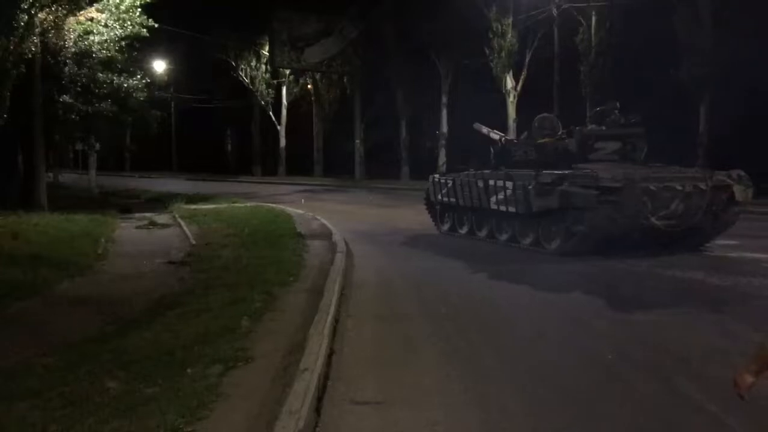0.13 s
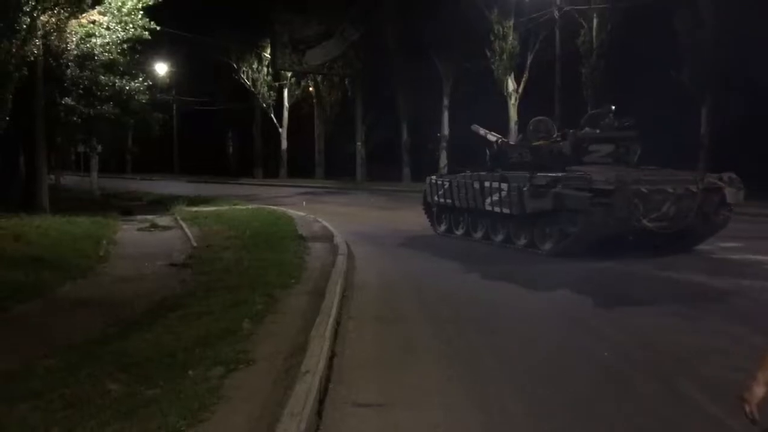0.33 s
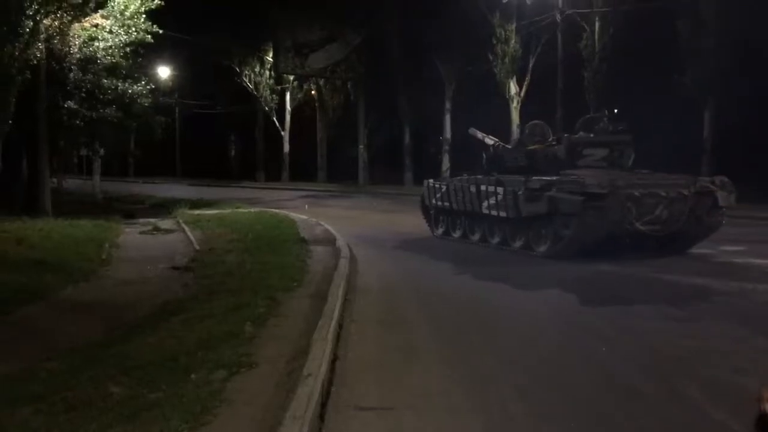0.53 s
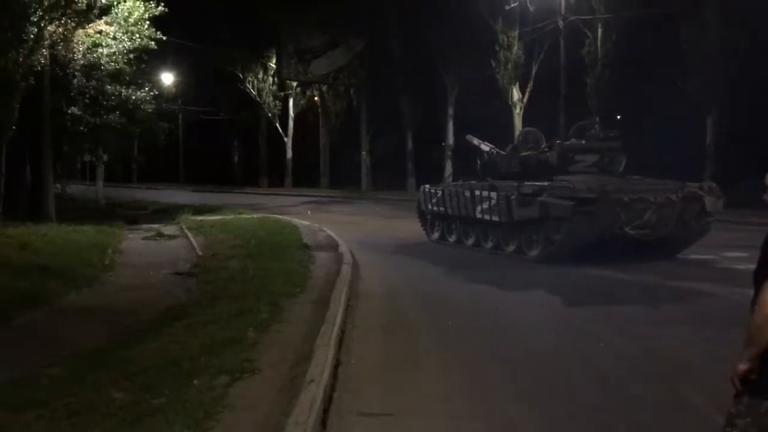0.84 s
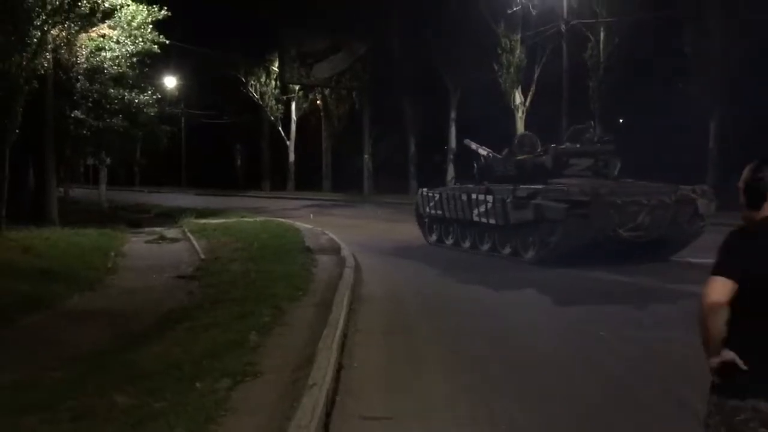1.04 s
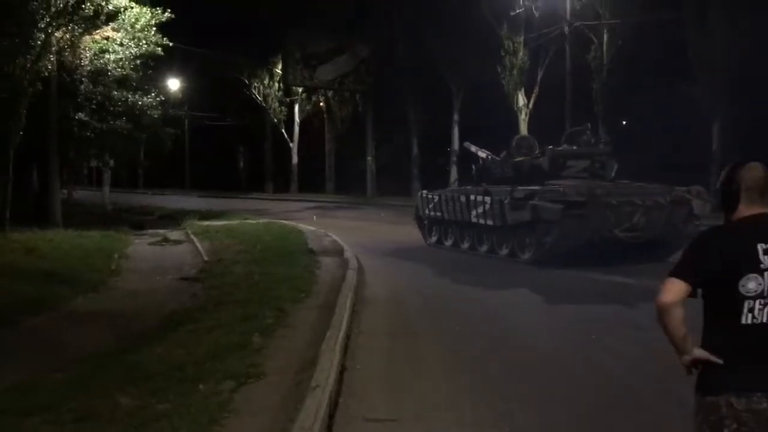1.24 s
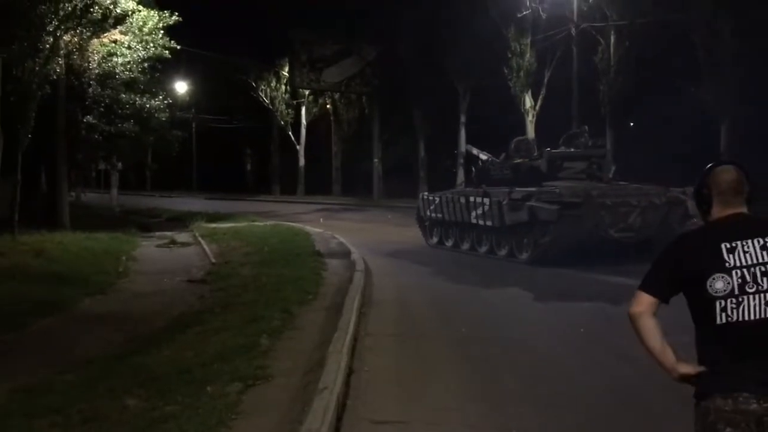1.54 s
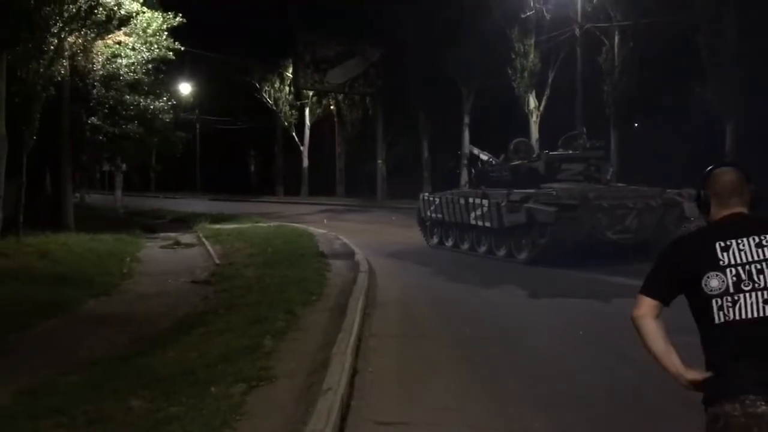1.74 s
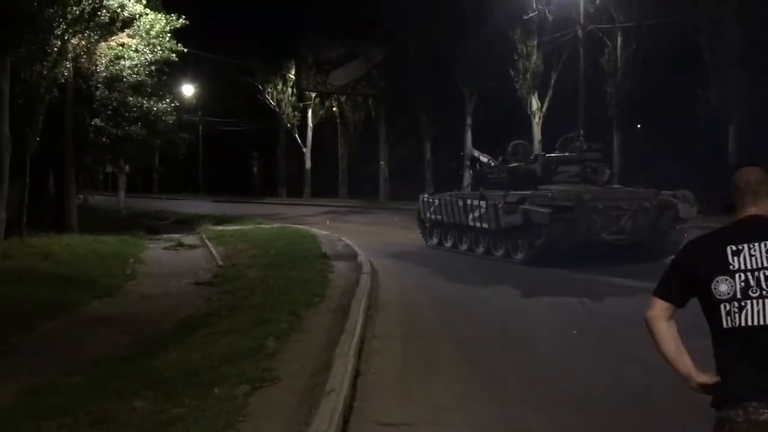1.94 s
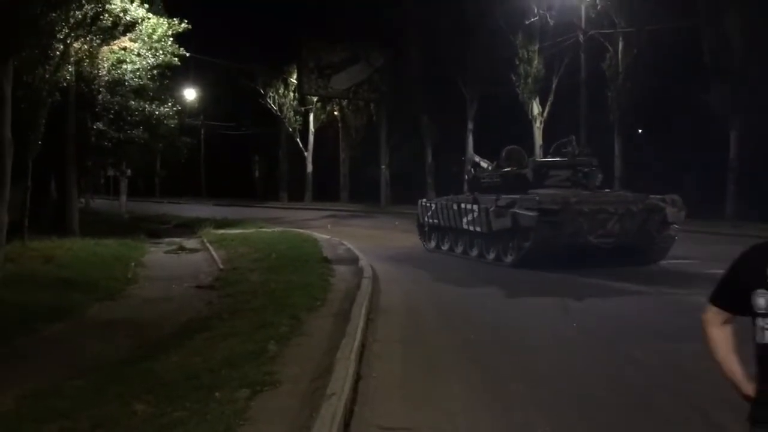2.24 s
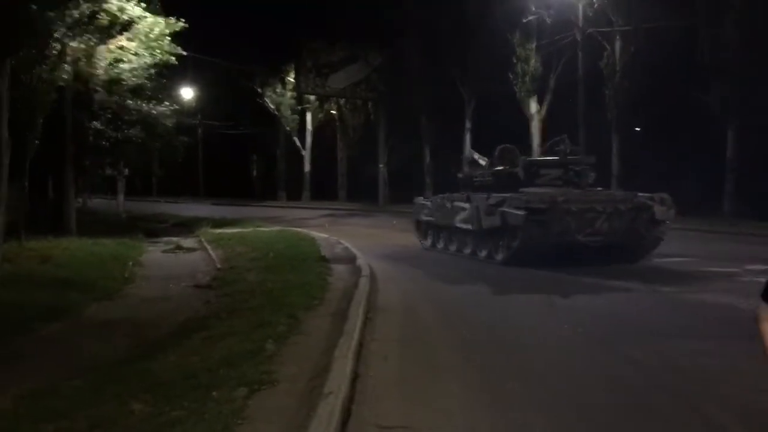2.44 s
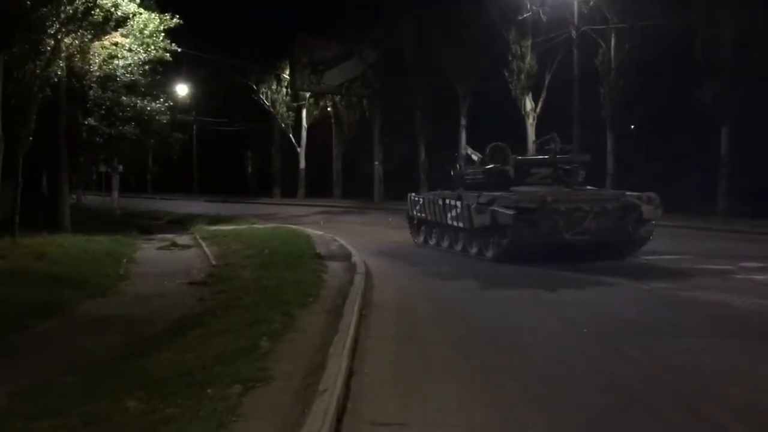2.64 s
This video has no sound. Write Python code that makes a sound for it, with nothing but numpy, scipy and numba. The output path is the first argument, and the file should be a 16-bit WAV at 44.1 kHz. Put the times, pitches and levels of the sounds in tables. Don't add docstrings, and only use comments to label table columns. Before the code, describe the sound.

Deep, uneven diesel drone and broad exhaust roar from a heavy tracked vehicle on an open road, starting abruptly; faint whine, track clatter and plate rattles beneath, squeaks growing denser toward the end, caught by a phone.

```python
import sys
import numpy as np
from scipy import signal
from scipy.fft import rfft, irfft
from scipy.io import wavfile
from scipy.ndimage import uniform_filter1d
from numba import njit

SR = 44100
rng = np.random.default_rng(int(sys.argv[2]) if len(sys.argv) > 2 else 0)


def how_loud(loudness_db):
    steps = np.asarray(loudness_db, float) / 20
    return 10 ** steps


def unload_wav(signal):
    wavfile.write(
        sys.argv[1],
        SR,
        np.round(np.clip(np.atleast_2d(signal).T, -1, 1) * 32767).astype(np.int16),
    )


N = 123039
CYLINDERS = 12


def level(x, db):
    return x * how_loud(db) / np.sqrt(np.mean(x ** 2))


@njit
def svf(x, hz, width):
    y, b, l = np.empty(len(x)), 0., 0.
    for i in range(len(x)):
        g, k = np.tan(np.pi * hz[i] / SR), width / hz[i]
        v = (b + g * (x[i] - l)) / (1 + g * (g + k))
        b, l, y[i] = 2 * v - b, l + 2 * g * v, k * v
    return y


def band(x, hz, width):
    return svf(x, hz + np.zeros(N), float(width))


def noise():
    return rng.standard_normal(N)


def walk(rate):
    k = int(SR / rate)
    steps = np.repeat(rng.standard_normal(N // 50)[:N // k + 1], k)
    return 1.3 * uniform_filter1d(uniform_filter1d(steps, k), k)[:N]


def coloured(shape, shared_db, flicker_db):
    f = np.maximum(np.arange(N // 2 + 1) * SR / N, 1)
    hz, db = np.array(shape).T
    spec = rfft(noise()) * how_loud(np.interp(np.log(f), np.log(hz), db, left=-90, right=-90))
    out = 0
    for c in np.arange(np.floor(2 * np.log2(hz[0])), 2 * np.log2(hz[-1]) + 1):
        part = np.clip(1 - abs(2 * np.log2(f) - c), 0, 1)
        out = out + irfft(spec * part, N) * how_loud(flicker_db * walk(14))
    return level(out, 0) * how_loud(shared_db)


def struck(t, table, gain_db, decay_s, width_hz):
    scrape = noise()
    out = 0
    for s, db, hz in table:
        ring = level(band(band(scrape, hz, width_hz), hz, width_hz), db + gain_db)
        attack = np.clip((t - s) / 0.0084, 0, 1)
        out = out + ring * attack * np.exp(-np.maximum(t - s, 0) / decay_s)
    return out


def groan(t):
    start_s, length_s, hz, width_hz = 2.58, .07, 550, 70
    return level(band(noise(), hz, width_hz), -44.5) * np.exp(-((t - start_s) / length_s) ** 2)


def rattles(t):
    # centre in seconds, length in seconds, level in dB.
    plate_bursts = [(0.188, 0.032, -42), (0.283, 0.021, -50), (0.476, 0.029, -43), (0.581, 0.013, -40),
                    (1.1, 0.016, -45), (1.826, 0.026, -41.5), (1.926, 0.011, -38), (2.38, 0.023, -52)]
    knocks_per_s, hz, width_hz = 600, 1080, 890
    knocks = (rng.random(N) < knocks_per_s / SR) * noise()
    env = sum(how_loud(db) * np.exp(-((t - s) / length) ** 2) for s, length, db in plate_bursts)
    return env * level(band(band(knocks, hz, width_hz), hz, width_hz), 0)


def clanks(t):
    # start in seconds, level in dB, pitch in Hz.
    plate_blows = [(.276, -31, 680), (.7, -39, 1044), (.86, -32, 684), (.905, -43, 636), (1.099, -32, 1028),
                   (1.42, -45, 430), (1.65, -38, 420), (1.74, -32.5, 410), (1.811, -30.5, 397),
                   (1.99, -38.5, 332), (2.14, -39, 516), (2.258, -35.5, 635), (2.53, -30, 600),
                   (2.586, -30, 490)]
    return struck(t, plate_blows, gain_db=-5, decay_s=0.024, width_hz=97)


def squeaks(t):
    # start in seconds, peak level in dB, pitch in Hz.
    pin_scrapes = [(0.1371, -52, 3330), (0.1735, -51, 3490), (0.2279, -48, 3530), (0.5676, -49, 3330),
                   (0.7726, -52, 3390), (0.8784, -49, 3780), (1.1648, -49, 3350), (1.3738, -54, 3500),
                   (1.7799, -46, 3440), (1.8342, -48, 3360), (1.9145, -49, 3500), (2.0368, -46, 4050),
                   (2.1031, -39, 3390), (2.2099, -46, 3540), (2.2643, -48, 3350), (2.3017, -47, 3880),
                   (2.3715, -52, 3430), (2.4334, -44, 3970), (2.4803, -48, 3300), (2.5606, -46, 3550)]
    return struck(t, pin_scrapes, gain_db=-10, decay_s=0.021, width_hz=200)


def ticks(t):
    # start in seconds, level in dB.
    link_slaps = [(.157, -52), (.382, -57), (.482, -56), (1.079, -55), (1.898, -54), (1.943, -48),
                  (2.042, -53), (2.107, -53), (2.264, -55), (2.321, -53), (2.366, -53), (2.474, -54),
                  (2.649, -56), (2.758, -54)]
    gain_db, decay_s, hz = -8.5, 0.016, 6460
    env = 0
    for s, db in link_slaps:
        attack = np.clip((t - s) / 0.003, 0, 1)
        env = env + how_loud(db + gain_db) * attack * np.exp(-np.maximum(t - s, 0) / decay_s)
    return env * level(band(noise(), hz, 5000), 0)


def tracks(t, effort_db):
    # frequency in Hz, density in dB per Hz.
    grind = [(1800, -8.5), (2800, 5), (4000, 3.5), (4800, -5.5), (6100, -5), (7000, -12.5), (10000, -15.5),
             (11700, -55)]
    # frequency in Hz, 60 dB decay time in seconds, level in dB.
    link_modes = [(2340, .05, -3), (2440, .05, -6), (3420, .035, 0), (3900, .035, -3), (4600, .015, -16),
                  (6130, .03, -16)]
    # centre in seconds, length in seconds, boost in dB.
    squeals = [(.18, .03, 5), (.56, .04, 7), (1.3, .02, 4), (1.7, .02, 2), (1.79, .02, 10), (1.84, .02, 8),
               (1.96, .04, 6), (2.115, .03, 12), (2.16, .02, 7), (2.22, .02, 7), (2.265, .02, 8),
               (2.37, .025, 11), (2.49, .03, 8), (2.59, .025, 8), (2.68, .03, 7)]
    knocks_per_s, scatter_db, cap_db, patch_db = 900, 2.5, 6, 1.5
    size_db = np.minimum(scatter_db * rng.exponential(size=N), cap_db)
    size = how_loud(size_db + patch_db * walk(25.5))
    knocks = (rng.random(N) < knocks_per_s / SR) * size * rng.choice([-1., 1.], N)
    rings = 0
    for hz, t60, db in link_modes:
        width_hz = np.log(1000) / np.pi / t60
        rings = rings + level(band(band(knocks, hz, hz / 4), hz, width_hz), db)
    squeal_db = sum(db * np.exp(-((t - s) / length) ** 2) for s, length, db in squeals)
    hiss = coloured(grind, -62 + effort_db + .3 * walk(11), flicker_db=.7)
    return hiss + level(rings, -67) * how_loud(.3 * effort_db + squeal_db)


def blower(firing_hz):
    ratio, width_hz, flicker_db = 35.6, 220, 3.5
    hz = ratio * firing_hz
    whine = band(band(noise(), hz, width_hz), hz, width_hz)
    return level(whine, -71) * how_loud(flicker_db * walk(25))


def roar(cycle, load_db):
    # frequency in Hz, density in dB per Hz.
    flow = [(16, -27), (120, -3.5), (170, -1.5), (310, -8.5), (600, -9.5), (1200, -11.5), (1900, -17.5),
            (2700, -30.5)]
    # frequency in Hz, width in Hz, level in dB.
    hull_modes = [(263, 55, -58), (600, 50, -49.5), (687, 10, -60.5), (1107, 93, -58)]
    slow_puff = 0.011 * np.sin(2 * np.pi * cycle)
    third_puff = 0.11 * np.sin(2 * np.pi * cycle * CYLINDERS / 4)
    hull = 0
    for hz, width_hz, db in hull_modes:
        ring = level(band(noise(), hz * (1 + .01 * walk(2)), width_hz), db)
        hull = hull + ring * how_loud(1.5 * walk(6))
    gas = coloured(flow, -37 + load_db + 0.79 * walk(8.6), flicker_db=0.5)
    return (1 + slow_puff + third_puff) * (gas + hull * how_loud(load_db))


def exhaust(t, cycle):
    # multiple of the four-stroke cycle, level in dB rms.
    orders = [(3, -72), (4, -64), (5, -50), (6, -42), (7, -48), (9, -41), (10, -54), (11, -54), (12, -32),
              (13, -52), (14, -56), (15, -38), (16, -55), (17, -41), (18, -49), (19, -48), (20, -54),
              (21, -51), (22, -58), (23, -58), (24, -56), (26, -57), (27, -54)]
    # time in seconds, firing tone in dB, bank throb in dB, sharp edge in dB.
    outlet = [(.1, -3, 1, -1), (.45, -5, -1, -5), (.55, -1, 1.5, -3), (.9, 3, 1, -1.5), (1.3, 0, -0.5, 0),
              (1.65, -0.5, 1.5, 1), (1.85, 0, 4.5, -12), (2., 4, -6, 2), (2.15, 0.5, 0, 1.5),
              (2.3, -3, 1.5, 1), (2.6, 1.5, -4, 0.5)]
    spread_rad, crank_rad, crank_lag_rad, offbeat_rad = -.09, 2.15, .2, 1.2
    pop_from, pop_rad, pop_lag_rad = 17, -.6, -2.02
    jitter_rad, wander_db = .12, .8
    s, *colour = np.array(outlet).T
    firing_db, bank_db, edge_db = (np.interp(t, s, c) for c in colour)
    out = 0
    for k, db in orders:
        if k == CYLINDERS:
            build_db = firing_db
        elif k in (6, 9):
            build_db = bank_db
        else:
            build_db = edge_db if k >= 18 else 0
        off = k - CYLINDERS
        if k < pop_from:
            phase = offbeat_rad * (k in (5, 7)) + crank_rad + crank_lag_rad * off + spread_rad * off ** 2
        else:
            phase = pop_rad + pop_lag_rad * (k - pop_from)
        turn = 2 * np.pi * k * cycle + phase + jitter_rad * walk(5.12)
        tone_db = db - 0.5 + build_db + wander_db * walk(4.77)
        out = out + np.sqrt(2) * how_loud(tone_db) * np.cos(turn)
    return out


def scene():
    # time in seconds, engine load in dB, track effort in dB.
    drive = [(.1, 1, 3), (.19, 3, 3), (.27, 0.5, 2.5), (.55, 0.5, 5), (.9, 0.5, 2.5), (1.1, -2, 2),
             (1.45, -0.5, 0.5), (1.7, -1, 3), (1.83, 0.5, 4), (2., 1, 4.5), (2.12, 0, 3.5), (2.37, 1.5, 6),
             (2.55, 0.5, 3), (2.78, 0, 4.5)]
    # time in seconds, firing rate in Hz.
    firing_rate = [(.1, 118.5), (.25, 117.2), (.45, 115.6), (1., 115.7), (1.3, 116.9), (1.5, 118.2),
                   (1.62, 117.7), (1.75, 114.6), (1.9, 113.3), (2.05, 110.5), (2.2, 107.5), (2.35, 110.5),
                   (2.5, 112.4), (2.7, 114)]
    t = np.arange(N) / SR
    s, load, effort = np.array(drive).T
    load_db, effort_db = np.interp(t, s, load), np.interp(t, s, effort)
    firing_hz = np.interp(t, *np.array(firing_rate).T)
    cycle = np.cumsum(firing_hz) / SR / CYLINDERS
    hull = groan(t) + rattles(t) + clanks(t)
    running_gear = squeaks(t) + ticks(t) + tracks(t, effort_db)
    engine = blower(firing_hz) + roar(cycle, load_db) + exhaust(t, cycle)
    return (hull + running_gear + engine)[None]


def low_pass(x):
    return signal.sosfilt(signal.butter(12, 11870, fs=SR, output="sos"), x)


def record(dry):
    start_s, open_s = .0832, .0006
    dry = signal.sosfilt(signal.butter(8, 11600, fs=SR, output="sos"), dry)
    opening = np.clip((np.arange(N) / SR - start_s) / open_s, 0, 1)
    return low_pass(dry * opening)


dry = scene()
out = record(dry)
unload_wav(out)
```